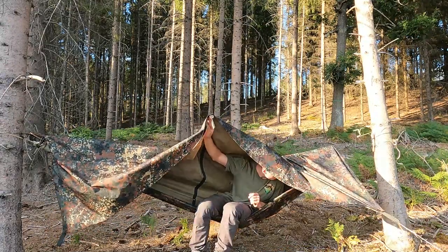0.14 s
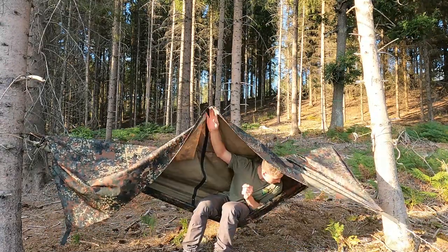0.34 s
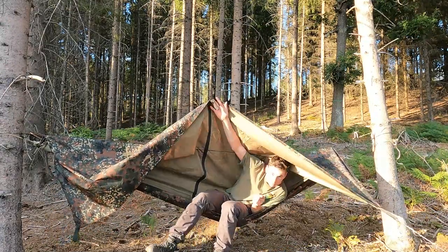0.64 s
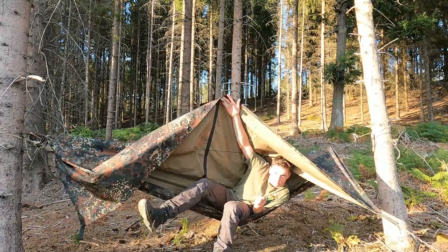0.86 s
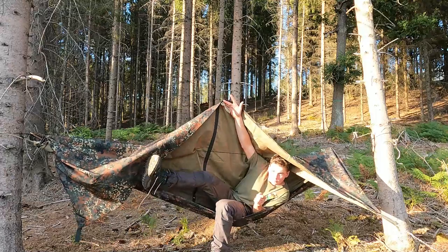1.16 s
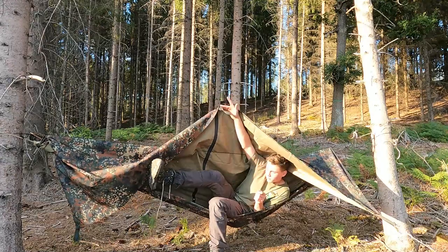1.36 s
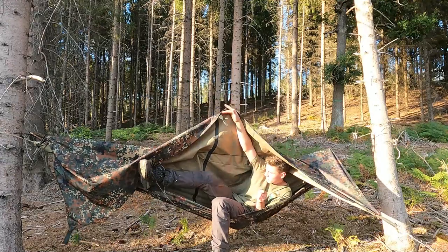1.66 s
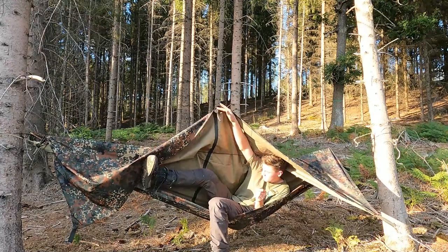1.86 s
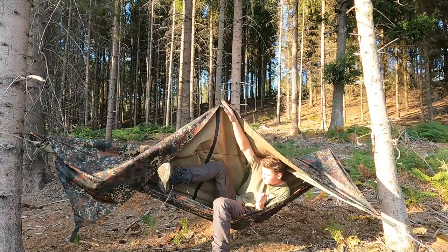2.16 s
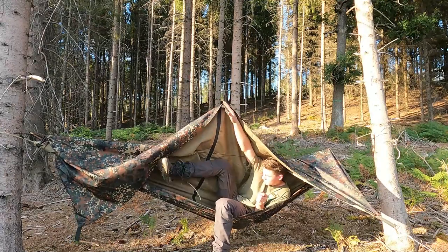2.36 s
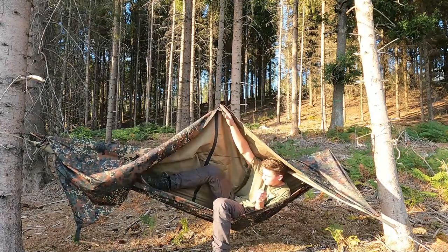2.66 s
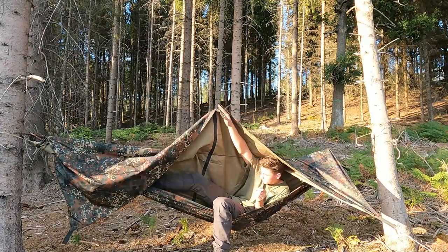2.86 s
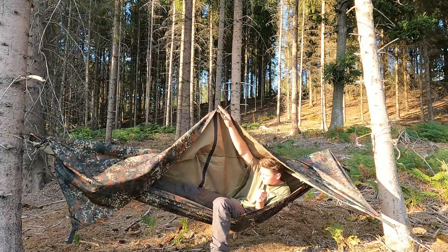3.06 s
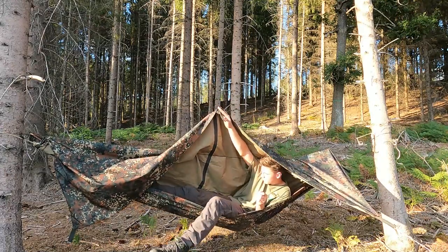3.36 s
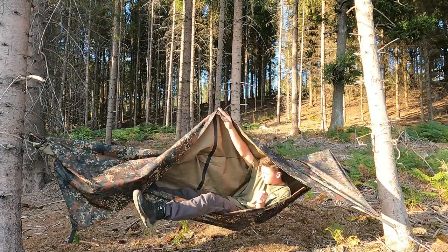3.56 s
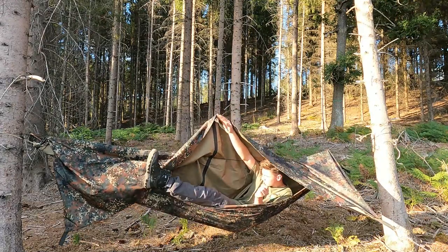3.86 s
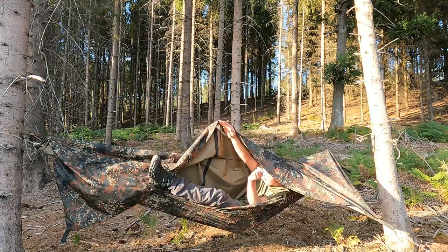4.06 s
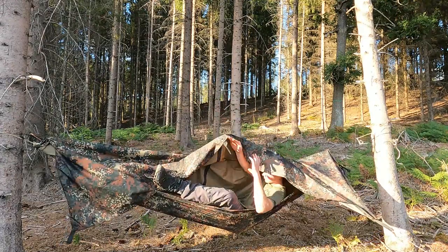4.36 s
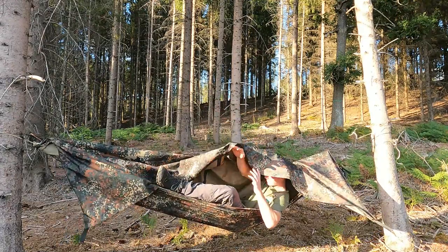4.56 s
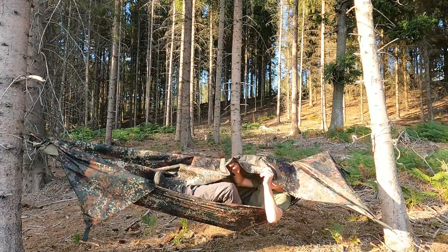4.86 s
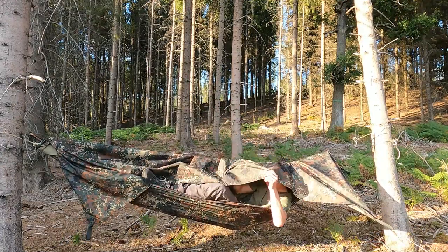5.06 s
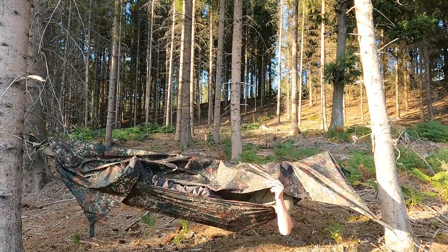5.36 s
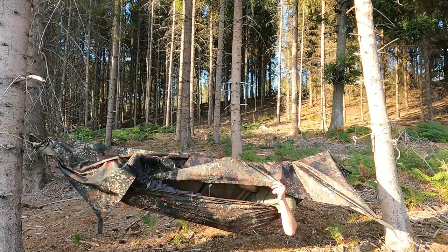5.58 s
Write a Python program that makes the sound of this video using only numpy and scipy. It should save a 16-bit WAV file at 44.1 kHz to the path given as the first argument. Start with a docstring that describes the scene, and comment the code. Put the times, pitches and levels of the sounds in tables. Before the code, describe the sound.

Quiet, close rustling of a stiff coated tarp, with fine hissing strokes, small crease pops and brief zip-like swishes over a faint wind murmur.

```python
"""Cloth slides on cloth with a fine hiss as someone climbs into a hammock and pulls the sheet over.
The sheet crumples and flaps, panels of coating buckle, creases snap and ring, and fast strokes sing
at the rate the threads pass. The place is under a coated tarp strung between trees: wind murmurs far
off, light air pushes on the microphone below hearing, and a faint noise differing between the channels
swells after the cloth. Cloth hiss is coloured noise with random ticks; air is coloured noise."""
import sys
import numpy as np
from scipy import signal
from scipy.fft import rfft, irfft
from scipy.io import wavfile

SR = 44100
rng = np.random.default_rng(int(sys.argv[2]) if len(sys.argv) > 2 else 0)


def master_out(mix):
    """Clip the mix to full scale and print it as 16-bit PCM to the path in sys.argv[1]."""
    frames = np.transpose(np.atleast_2d(mix))
    ceiling = np.clip(frames, -1, 1)
    pcm = np.round(ceiling * 32767).astype(np.int16)
    wavfile.write(sys.argv[1], SR, pcm)


def ratio_of_db(decibels):
    """Turn decibels (scalar or array-like) into linear amplitude factors; 0 dB maps to 1."""
    return 10 ** (np.asarray(decibels, float) / 20)


N = 252252


def rms_one(x):
    """Scale to rms 1."""
    return x / np.sqrt(np.mean(x ** 2) + 1e-20)


def in_time(rows):
    """Columns of a curve whose first column is seconds, drawn out to one value a sample."""
    seconds, *columns = np.transpose(rows)
    return [np.interp(np.arange(N) / SR, seconds, column) for column in columns]


def colour(x, points):
    """Weight the spectrum of x by a curve of (Hz, dB), straight over log frequency, 60 dB down outside."""
    hz, db = np.transpose(points)
    f = np.maximum(np.arange(N // 2 + 1) * SR / N, .1)
    gain_db = np.interp(np.log(f), np.log(hz), db, left=-60, right=-60)
    return irfft(rfft(x) * ratio_of_db(gain_db), N)


def coloured_noise(points):
    """Steady noise of rms 1 with the given spectrum."""
    return rms_one(colour(rng.standard_normal(N), points))


def drift(rate_hz):
    """Slow chance around zero, spread 1: noise through two equal low-passes."""
    r = np.exp(-2 * np.pi * rate_hz / SR)
    noise = rng.standard_normal(N + SR)
    # the first second lets the filter settle
    return rms_one(signal.lfilter([1], [1, -2 * r, r * r], noise)[SR:])


def ring(clicks, hz, t60):
    """A unit click sets a sine of starting height 1 ringing, 60 dB down after t60 seconds."""
    r = ratio_of_db(-60 / (t60 * SR))
    w = 2 * np.pi * hz / SR
    return signal.lfilter([0, np.sin(w)], [1, -2 * r * np.cos(w), r * r], clicks)


def friction(spectrum, level_db, per_s, spread_db, grain_db, patchy_db, patch_rate):
    """Fibres catch and let go: a smooth hiss plus random ticks of uneven size, in the cloth's colour."""
    sizes = ratio_of_db(spread_db * np.minimum(rng.exponential(1, N), 5)) * rng.choice([-1, 1], N)
    ticks = rms_one(sizes * (rng.random(N) < per_s / SR))
    rub = rng.standard_normal(N) + ratio_of_db(grain_db) * ticks
    patches_db = patchy_db * drift(patch_rate)
    return ratio_of_db(level_db + patches_db) * rms_one(colour(rub, spectrum))


# Far low murmur of wind in the trees.
# Each row: frequency in Hz, spectral density in dB per Hz.
MURMUR_COLOUR = [(30, -15), (60, -3.5), (110, -3), (160, -6.5), (300, -10.5), (600, -26)]


def tree_murmur():
    """Wind in far trees: low coloured noise whose level wavers slowly."""
    level_db = -73.5 + 1.2 * drift(1.0)
    return ratio_of_db(level_db) * coloured_noise(MURMUR_COLOUR)


# Colour of the air pushing on the microphone.
# Each row: frequency in Hz, spectral density in dB per Hz.
AIR_COLOUR = [(1, -28), (3, 2.5), (6, -1.5), (12, -29.5), (25, -29.5), (50, -37), (90, -68)]
# Strength of that air as it comes and goes.
# Each row: time in seconds, level in dB.
GUSTS = [(0.0, -53.5), (0.33, -51.5), (0.51, -53), (0.65, -46), (1.59, -48), (2.04, -64), (2.26, -45.5),
         (2.64, -56), (2.87, -51), (3.03, -55), (3.97, -40.5), (4.21, -46), (4.29, -44), (5.45, -43),
         (5.72, -50)]


def air_on_microphone():
    """Light air pushes on the microphone: noise mostly below hearing, swelling with the gusts."""
    level_db, = in_time(GUSTS)
    return ratio_of_db(level_db) * coloured_noise(AIR_COLOUR)


# Colour of the faint noise that differs between the channels.
# Each row: frequency in Hz, spectral density in dB per Hz.
SIDE_COLOUR = [(2, 16), (30, -42), (150, -11), (500, -5), (1200, -14.5), (4000, -11.5), (10000, -11.5),
               (16000, -8)]


def side_noise(cloth):
    """Faint flickering noise: a steady floor plus a part following the cloth's recent loudness."""
    floor_db, follow_db, linger_s = -87, -32.5, 0.058
    linger = np.exp(-1 / (linger_s * SR))
    recent_power = signal.lfilter([1 - linger], [1, -linger], cloth ** 2)
    following = ratio_of_db(follow_db) * np.sqrt(recent_power)
    flicker = ratio_of_db(7.0 * drift(8.1))
    return (ratio_of_db(floor_db) + following) * flicker * coloured_noise(SIDE_COLOUR)


# Low flapping of the slack sheet over time.
# Each row: time in seconds, level in dB before the patchiness.
FLAP_LEVEL = [(0, -65), (.12, -67), (.4, -64.5), (.6, -69.5), (.83, -60), (1.0, -58), (1.09, -62.5),
              (1.2, -56.5), (1.36, -58), (1.46, -63), (1.65, -61.5), (1.85, -69), (2.0, -63), (2.15, -66.5),
              (2.26, -56.5), (2.34, -56.5), (2.4, -60), (2.62, -68.5), (2.77, -61.5), (2.85, -74),
              (3.05, -56), (3.35, -71), (3.45, -69), (3.72, -59), (3.92, -64), (4.03, -59.5), (4.15, -61.5),
              (4.52, -56), (4.7, -62), (4.84, -54), (4.92, -63.5), (5.05, -61.5), (5.25, -56), (5.5, -52.5),
              (5.72, -60)]


def flap_level():
    """How hard the slack sheet flaps, in dB at each sample."""
    return in_time(FLAP_LEVEL)[0]


# Colour of the flapping sheet.
# Each row: frequency in Hz, spectral density in dB per Hz.
FLAPPING = [(120, -25), (200, -8.5), (400, -2), (700, -2), (1000, -2.5), (1500, -6), (2600, -14)]


def flapping(flap_db):
    """The slack sheet flaps: low, sparse, patchy friction noise."""
    return friction(FLAPPING, flap_db, per_s=200, spread_db=2.5, grain_db=-6.0, patchy_db=2.1, patch_rate=29)


def crinkles(level_db, per_s, cycles):
    """Small stiff panels of the coating buckle at random, each ringing a few cycles at one of 18 pitches."""
    sizes = ratio_of_db(2.4 * np.minimum(rng.exponential(1, N), 4)) * rng.choice([-1, 1], N)
    # buckling comes in flurries
    born = rng.random(N) < per_s * ratio_of_db(3.0 * drift(8.0)) / SR
    pitches = np.geomspace(700, 4200, 18)
    dealt = rng.integers(0, 18, N)
    rings = np.zeros(N)
    for k, hz in enumerate(pitches):
        clicks = sizes * born * (dealt == k) + 1e-18
        rings += ring(clicks, hz, cycles / hz)
    # the panels give way softly
    soft = signal.lfilter([.15], [1, -.85], rings)
    return ratio_of_db(level_db) * rms_one(soft)


# Creases snapping.
# Each row: start in seconds, level of the pop in dB, its lower pitch in Hz, brightness of the tick
# against the pop in dB, time in seconds for the crackle to fall 30 dB.
SNAPS = [(.0333, -29, 1200, 2, 0.016), (0.1194, -38.5, 1000, -7, .008), (.376, -45, 637, -20, 0.019),
         (1.268, -36.5, 1100, -17, 0.013), (1.299, -34, 1700, -10, .004), (1.42, -34, 1210, 6.5, 0.03),
         (1.611, -43, 1000, -10, 0.0044), (1.79, -34.5, 2490, -18, .012), (2.011, -42.5, 560, -20, 0.011),
         (2.447, -42, 1300, -12, .005), (2.671, -37.5, 1210, -2, 0.011), (2.789, -38, 557, -20, .008),
         (2.971, -38, 706, -8, .004), (3.205, -45, 630, -12, 0.024), (3.718, -38.5, 680, -20, 0.0054),
         (3.983, -42.5, 800, -12, .006), (4.012, -40, 1060, -6, 0.0051), (4.786, -36.5, 1400, 2, 0.012),
         (4.8496, -37.5, 600, -22, 0.018), (4.871, -33.5, 1500, -2, 0.0036), (5.01, -36, 950, -20, 0.004),
         (5.326, -27.5, 2110, -21, .003), (5.529, -42, 1400, -12, .006), (5.7, -35.5, 1010, -16, .012)]


def snaps():
    """Each crease lets go with one pop of a cycle or two, then a short crackle; the ground sends it back."""
    echo_s, echo_db = .0036, -9   # the way by the ground is about 1.2 m longer
    out, length = np.zeros(N + SR), SR // 20
    chance = rng.standard_normal((len(SNAPS), length))
    for (s, db, hz, bright_db, crackle_s), noise in zip(SNAPS, chance):
        decay_db = -30 * np.arange(length) / SR / max(crackle_s, .001)
        crack = 0.051 * noise * ratio_of_db(decay_db)
        crack[0] = -1
        # the fold turns over in a third of a cycle
        push = np.convolve(crack, np.hanning(int(SR / hz / 3) + 2))[:length]
        body = ring(push, hz, 6.6 / hz) + 1.1 * ring(push, 1.45 * hz, 6.1 / hz)
        tick = ratio_of_db(bright_db) * ring(crack, 5300, 0.00057)
        at = round(s * SR)
        out[at:at + length] += ratio_of_db(db) * (body / np.abs(body).max() + tick)
    lag = round(echo_s * SR)
    dulled = signal.lfilter([.4], [1, -.6], out)
    out[lag:] += ratio_of_db(echo_db) * dulled[:-lag]
    # a small crease moves no air in the bass
    no_bass = signal.butter(2, 480, "high", fs=SR, output="sos")
    return signal.sosfilt(no_bass, out[:N])


# Threads passing under fast strokes.
# Each row: overtone level in dB against the lower tone, unevenness as a share of the rate, and a curve
# of time in seconds, mean threads per second, lower tone's peak level in dB before the grip varies.
WEAVE = [(-10, .05, [(2.308, 1000, -51), (2.32, 1400, -49), (2.336, 1480, -46)]),
         (3, .2, [(2.336, 1350, -46), (2.345, 1600, -45)]), (10, .045, [(2.52, 500, -76), (2.57, 750, -80),
         (2.605, 1030, -79)]), (4, .03, [(2.685, 490, -64), (2.705, 550, -62), (2.73, 800, -63),
         (2.755, 960, -58), (2.87, 875, -59), (2.93, 890, -57), (2.97, 800, -60), (3.02, 730, -57),
         (3.05, 560, -58), (3.085, 330, -66)]), (-20, .05, [(.82, 340, -64), (.95, 370, -63),
         (1.04, 330, -65)]), (-10, .07, [(4.01, 920, -59), (4.12, 820, -63), (4.19, 760, -60),
         (4.32, 695, -65)]), (5, .04, [(4.75, 1680, -62), (4.795, 1480, -60)]),
         (3, .05, [(5.015, 1600, -64), (5.04, 1650, -65)]), (-8, .05, [(5.13, 1080, -60), (5.23, 980, -57),
         (5.31, 1250, -58)]), (-10, .055, [(5.5, 930, -55), (5.545, 1400, -56), (5.585, 1300, -55)])]


def weave():
    """Threads pass at an uneven rate: a wavering tone and its overtone, throbbing as the grip changes."""
    fade_share, fade_db_per_share = .12, 30   # outside its stroke: 30 dB lost per .12 of its length
    out, t = np.zeros(N), np.arange(N) / SR
    waver, sway = drift(142), drift(150)
    grip, grip_up = drift(25), drift(22)
    hesitation = .015 * drift(18)   # of the hand, as a share of its speed
    # the slack sheet blurs the lower tone more than the overtone, and lifts it by 50 Hz
    blur = 2 * np.pi * np.cumsum(45 * sway + 50) / SR
    for overtone_db, uneven, stroke in WEAVE:
        per_s, level_db = in_time(stroke)
        start, end = stroke[0][0], stroke[-1][0]
        outside = np.maximum(np.maximum(start - t, t - end), 0) / (end - start)
        fade_db = np.minimum(fade_db_per_share * outside / fade_share, 100)
        threads_per_s = per_s * (1 + uneven * waver + hesitation)
        phase = 2 * np.pi * np.cumsum(threads_per_s) / SR
        lower = ratio_of_db(3 * grip) * np.sin(phase + blur)
        overtone = ratio_of_db(overtone_db + 3.6 * grip_up) * np.sin(2 * phase)
        out += ratio_of_db(level_db - fade_db) * (lower + overtone)
    return out


# Separate strokes of cloth over cloth.
# Each row: time full speed is reached in seconds, rise in seconds, hold in seconds, fall in seconds,
# sliding hiss in dB, crumpling in dB.
STROKES = [(0.4, 0.13, .03, 0.15, -55, -58.5), (0.72, 0.21, .005, 0.1, -63.5, -58.5),
           (0.938, 0.18, 0.13, 0.065, -56.5, -59), (1.18, 0.027, .005, 0.23, -62.5, -61),
           (1.328, 0.05, 0.034, 0.076, -52.5, -54.5), (1.768, .09, .005, 0.051, -58.5, -60),
           (1.859, .05, .003, 0.043, -59, -59.5), (1.99, 0.087, .005, 0.18, -57, -62.5),
           (2.166, 0.11, .005, 0.096, -58, -60.5), (2.257, 0.032, 0.011, .04, -53.5, -50.5),
           (2.329, 0.024, 0.012, .016, -51.5, -48), (2.428, 0.15, .005, 0.092, -62.5, -62),
           (2.579, .045, .003, 0.057, -63.5, -70), (2.66, 0.032, .003, 0.061, -64, -79),
           (2.792, 0.13, 0.11, 0.23, -54.5, -50.5), (3.531, 0.09, 0.2, .12, -51, -53.5),
           (4.025, .08, 0.046, 0.091, -55.5, -55), (4.227, 0.16, 0.25, 0.19, -52, -54),
           (4.777, 0.057, .003, .075, -55, -55.5), (5.006, 0.076, .005, 0.14, -56, -55),
           (5.224, 0.15, 0.041, 0.19, -52, -50.5), (5.486, 0.21, 0.05, 0.21, -50.5, -50)]
# The sheet stirring between strokes.
# Each row: time in seconds, sliding hiss in dB, crumpling in dB.
STIR = [(0, -68, -64), (.25, -70, -68), (.6, -64, -59.5), (1.55, -64, -61.5), (2.3, -70.5, -66.5),
        (2.55, -68.5, -75), (3.2, -69.5, -65.5), (3.35, -68, -68.5), (3.92, -68, -64), (4.7, -70, -55.5),
        (4.901, -71, -63), (5.72, -74, -65)]


def stroke_levels():
    """Sliding and crumpling in dB: strokes speed up and slow down, their powers adding to the stirring."""
    edge_db, edge_power = 12, 1.9   # lost one rise before or one fall after the hold; roundness of the top
    widths = (1, 0.96)   # sliding, crumpling: stretch of the edges in time
    coarse = 32   # samples per step
    t = np.arange(0, N, coarse) / SR
    levels_db = []
    for column, (widen, stir_db) in enumerate(zip(widths, in_time(STIR))):
        power = ratio_of_db(2 * stir_db[::coarse])
        for s, rise, hold, fall, *stroke_db in STROKES:
            before, after = (s - t) / rise, (t - s - hold) / fall
            away = np.maximum(np.maximum(before, after), 0) / widen
            lost_db = edge_db * np.minimum(away, 5) ** edge_power
            power = power + ratio_of_db(2 * (stroke_db[column] - lost_db))
        levels_db.append(np.interp(np.arange(N) / SR, t, 10 * np.log10(power)))
    return levels_db


# Colour of crumpling cloth.
# Each row: frequency in Hz, spectral density in dB per Hz.
CRUMPLING = [(600, -13.5), (1200, -5), (2000, -3), (3500, -4.5), (5000, -9.5), (8000, -17.5)]


def crumpling(crumple_db):
    """The sheet folds and creases: friction noise strongest in the middle of the range."""
    return friction(CRUMPLING, crumple_db, per_s=900, spread_db=1.0, grain_db=-5.5,
                    patchy_db=1.0, patch_rate=11.3)


# Colour of cloth sliding on cloth as the microphone hears it, with peaks near 8.2 and 12.9 kHz and dips near
# 6.5 and 10.5 kHz. # Each row: frequency in Hz, spectral density in dB per Hz.
SLIDING = [(2500, -12.5), (4500, -3), (6500, -7), (8200, 1), (9300, -4.5), (10500, -13.5), (12900, -5),
           (14500, -12), (16500, -15)]


def sliding(slide_db):
    """Cloth slides on cloth: a fine, dense treble hiss of catching fibres."""
    return friction(SLIDING, slide_db, per_s=3300, spread_db=1.5, grain_db=-3.5,
                    patchy_db=1.07, patch_rate=11)


def scene():
    """Cloth, air and murmur sit in the middle; only a faint noise differs between the channels."""
    slide_db, crumple_db = stroke_levels()
    flap_db = flap_level()
    cloth = sliding(slide_db) + crumpling(crumple_db) + flapping(flap_db)
    cloth += crinkles((crumple_db + flap_db) / 2 - 12.5, per_s=250, cycles=8.1)
    cloth += weave() + snaps()
    middle = cloth + air_on_microphone() + tree_murmur()
    # opposite in the two channels
    return middle + side_noise(cloth) * [[1], [-1]]


def band_limit(x):
    """A steep low-pass at the top of the band."""
    return signal.sosfilt(signal.butter(12, 16620, fs=SR, output="sos"), x)


def record(dry):
    """The top is cut off sharply at 15750 Hz."""
    below_cutoff = np.arange(N // 2 + 1) * SR / N < 15750
    cut = irfft(rfft(dry) * below_cutoff, N)
    return band_limit(cut)


dry = scene()
out = record(dry)
master_out(out)
```